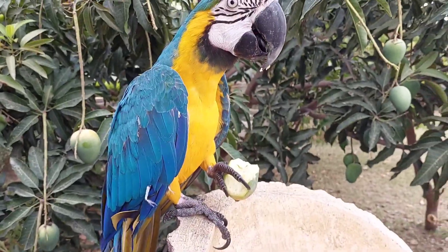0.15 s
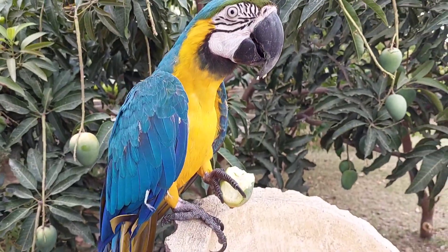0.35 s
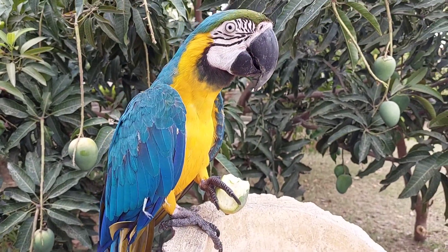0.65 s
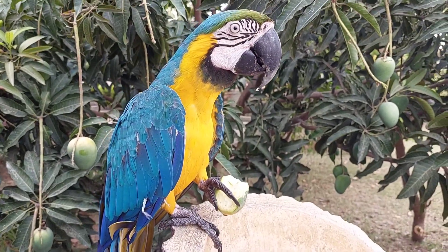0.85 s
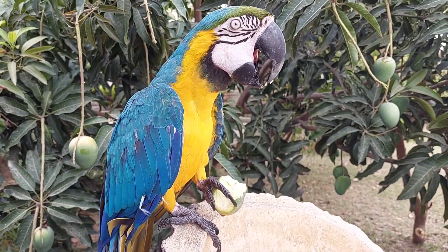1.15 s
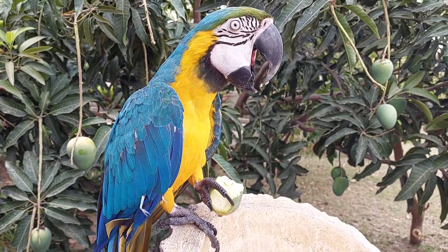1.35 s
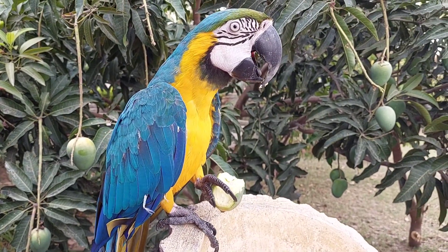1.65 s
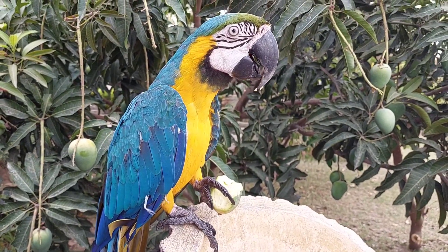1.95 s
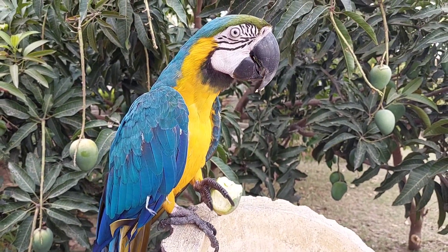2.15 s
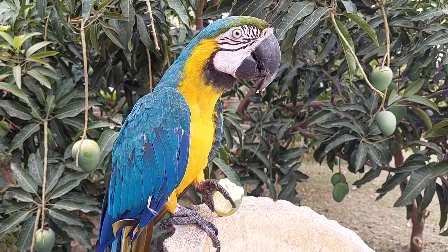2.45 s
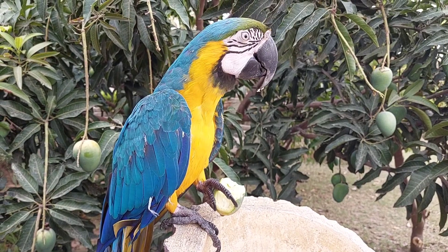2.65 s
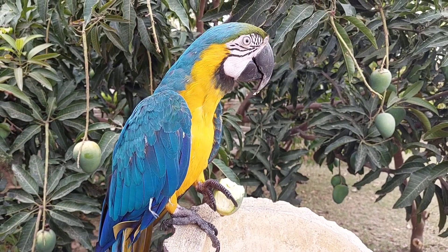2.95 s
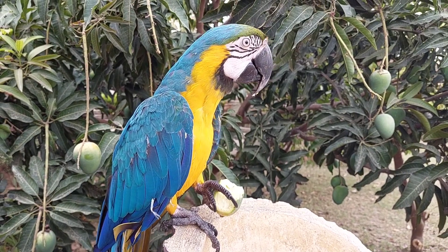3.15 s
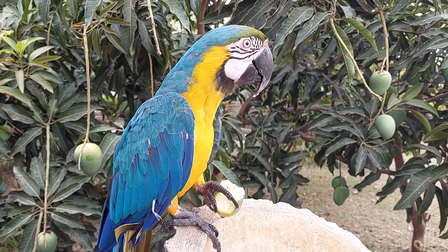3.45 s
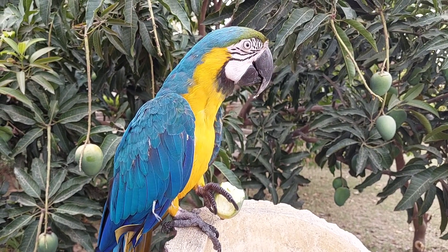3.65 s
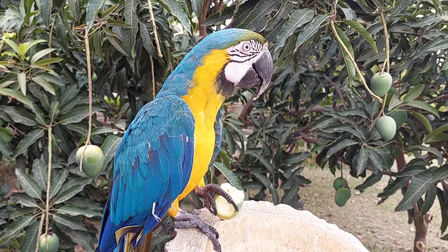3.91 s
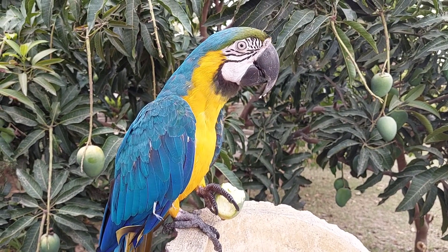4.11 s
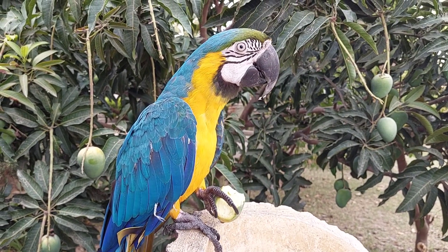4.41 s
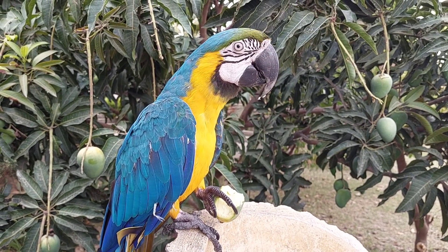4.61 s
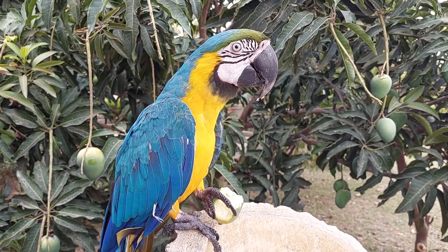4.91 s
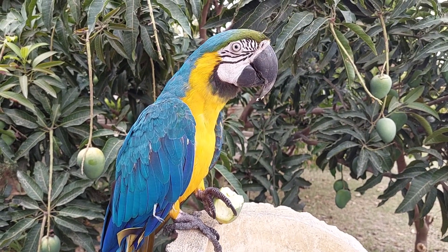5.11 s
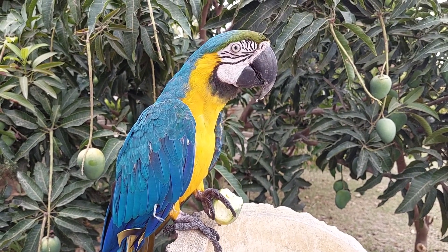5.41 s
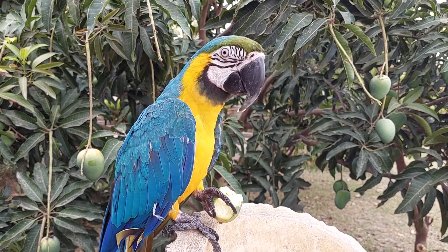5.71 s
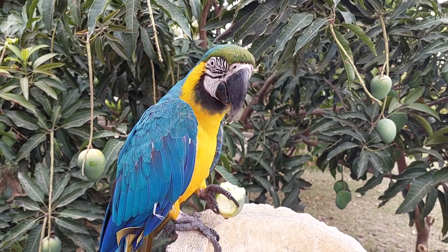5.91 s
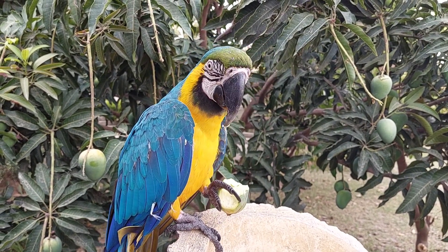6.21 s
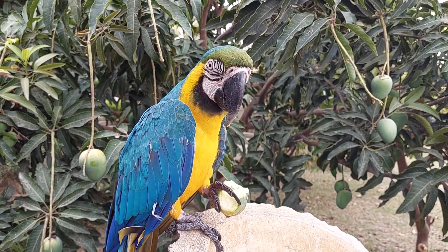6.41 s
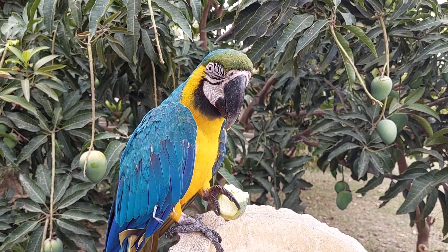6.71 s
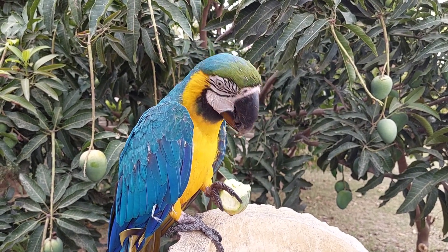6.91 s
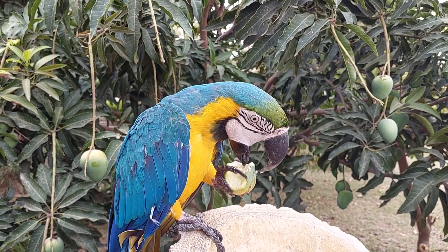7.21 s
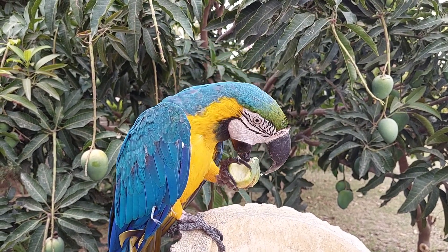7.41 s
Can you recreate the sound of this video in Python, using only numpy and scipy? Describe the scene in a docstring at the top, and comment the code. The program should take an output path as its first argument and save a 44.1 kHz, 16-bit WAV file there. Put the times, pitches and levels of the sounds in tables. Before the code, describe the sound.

A close parrot squawks raucously once, then mutters chirps, clucks and soft whistles in a quiet garden with faint distant birds.

```python
"""A chirp's tail opens the scene; far birds call, a beak clicks, and at 1.1 s a macaw squawks and warbles.
Falling chirps, a rustle and nasal clucks follow, then from 3.4 s a growl, a squeal and soft whistles.
A squall falls at 5.7 s; more clucks and, at the end, two chirps follow. Clicks and far calls are dotted about.
Calls are stacks of overtones plus hoarse noise, coloured by a throat; clicks and rustles are shaped noise.
The garden returns a weak echo over faint rumble and hiss; a mid-range haze is gone by 0.8 s."""
import sys
import numpy as np
from scipy import signal
from scipy.fft import rfft, irfft
from scipy.io import wavfile
from scipy.ndimage import uniform_filter1d

SR = 44100
rng = np.random.default_rng(int(sys.argv[2]) if len(sys.argv) > 2 else 0)


def log_audio(samples):
    """Write samples as a 16-bit WAV file to the path given in sys.argv[1]."""
    # one column per channel
    frames = np.atleast_2d(samples).T
    # limit to full scale, then quantise
    limited = np.clip(frames, -1, 1)
    pcm = np.round(limited * 32767).astype(np.int16)
    wavfile.write(sys.argv[1], SR, pcm)


N = 333396  # length in samples
CUTOFF_HZ = 16000  # top of the sound


# the loud squawk, one row: (start t/s, length/s, held f/Hz, held level/dB)
SQUAWK = (1.103, .389, 795, -10.9)
# throat and beak resonances of the squawk: (f/Hz, level/dB)
SQUAWK_THROAT = [(480, -34), (680, -16), (950, -13.5), (1250, -10.5), (1550, 1), (2050, -5), (2700, -10),
                 (3130, -1), (3500, -1.5), (3750, -10.5), (4350, -14.5), (4620, -25), (5500, -17),
                 (6250, -24), (7050, -17), (10000, -33)]
# between its throbbing entry and its warble the squawk flips up to a clean pitch
FLIP_START_S, FLIP_END_S, FLIP_RATIO, FLIP_DB = 1.189, 1.208, 1.1, 2
ENTRY_THROB_DB = 4.5  # extra throb before the flip, for a voice with no roughness


def squawk(throb_db=1.55, held_rough=0.39, slack_rough=0.8, bend=0.03, third_db=-6,
           top_dull_db=3, entry_dull_db=6, opening_s=.17):
    """It starts low, rough and dull, throbs, flips up once, then saws, loudest and brightest low in each sweep."""
    start, length, held_hz, level_db = SQUAWK
    t, hz = glide(start, length, held_hz, slide=0.033, scoop=.85, scoop_s=.08, droop=0.82, droop_s=0.062)
    # a pitch below the held one means a slack, rougher voice
    rough = held_rough + slack_rough * np.maximum(1 - hz / held_hz, 0)
    # both switches go from 0 to 1 within 5 ms
    flipped = np.clip(np.minimum(t - FLIP_START_S, FLIP_END_S - t) / .005, 0, 1)
    entry = np.clip((FLIP_START_S - t) / .005, 0, 1)
    sweep, swell_db = warble(t)
    shake = (1 - flipped) * flutter(len(t))
    hz = hz * FLIP_RATIO ** flipped * sweep * (1 + bend * (1 + entry) * shake)
    level_db = level_db + effort(t, start, length, attack_s=0.074, release_s=0.031, edge_db=38)
    level_db = level_db + FLIP_DB * flipped + swell_db
    level_db = level_db + (throb_db + ENTRY_THROB_DB * entry * (1 - rough)) * shake
    edges = ramp(t - start, opening_s) + ramp(start + length - t, opening_s / 2)
    dull_db = top_dull_db * (sweep - 1) + entry_dull_db * edges
    rough = rough * (1 + entry / 2 - flipped / 2)
    return voice(t, hz, level_db, rough, SQUAWK_THROAT, jitter=.13, rasp_share=.55,
                 harmonic_db={3: third_db}, dull_db=dull_db)


# one sweep of the warble, up and snapping back: (share of the cycle, pitch ratio, level/dB)
WARBLE = [(0, 1.03, -1), (.2, 1.04, 3), (.42, 1.15, 0), (.65, 1.32, -2), (.87, 1.54, -7), (1, 1.03, -1)]
WARBLE_START_S, WARBLE_END_S = 1.2035, 1.466
WARBLE_HZ, WARBLE_SLOWS_HZ_PER_S = 29.6, 14.5  # sweeps per second at the start, and how fast they slow


def warble(t):
    """Pitch ratio and swell (dB) of the squawk's sweeps, which slow a little as they go."""
    age = t - WARBLE_START_S
    warbling = (t > WARBLE_START_S) & (t < WARBLE_END_S)
    cycle = (WARBLE_HZ - WARBLE_SLOWS_HZ_PER_S * age / 2) * age % 1
    share, ratio, swell_db = np.transpose(WARBLE)
    return np.interp(cycle, share, ratio) ** warbling, warbling * np.interp(cycle, share, swell_db)


def puffs(level_db=-39.5, top_hz=130, right_db=-12):
    """Each sweep of the warble pushes out a low thump of air, made of low-pitched noise."""
    t = np.arange(int(WARBLE_START_S * SR), int(WARBLE_END_S * SR)) / SR
    low_band = signal.butter(2, [50, top_hz], "band", fs=SR, output="sos")
    thump = rms_one(signal.sosfilt(low_band, rng.standard_normal(len(t))))
    level = from_db(level_db + warble(t)[1]) * signal.windows.tukey(len(t), .5)
    return from_db([[0], [right_db]]) * place(t, level * thump)


def flutter(size, flutter_hz=98, unevenness=.03):
    """A slow second vibration of the syrinx (the bird's voice box), in harsh calls."""
    rate_hz = flutter_hz * (1 + unevenness * wander(size, flutter_hz))
    return np.sin(2 * np.pi * np.cumsum(rate_hz) / SR)


# a clean squeal that breaks into a lower register, one list each: (t/s, f/Hz, level/dB)
SQUEAL = [
    [(3.855, 2985, -57), (3.865, 2918, -16.5), (3.892, 2818, -12.5), (3.908, 2700, -25.5),
     (3.922, 2650, -28)],
    [(3.914, 2130, -26.5), (3.928, 2080, -19.5), (3.96, 1720, -17.5), (3.983, 1526, -12),
     (4.005, 1187, -24), (4.02, 960, -48.5)],
]
# throat and beak resonances of the squeal: (f/Hz, level/dB)
SQUEAL_THROAT = [(1000, -31), (2000, -24), (2900, -1.5), (4200, -14.5), (5700, -22), (9500, -50)]


def squeal(rows, slack_rough=0.61, slack_hz=1120, third_db=-5):
    """A taut syrinx sings clean; it roughens as the pitch sags."""
    t, hz, level_db = controls(rows)
    rough = slack_rough * np.minimum(slack_hz / hz, 1) ** 5
    return voice(t, hz, level_db, rough, SQUEAL_THROAT, harmonic_db={3: third_db})


# a squall that starts harsh and clears as it falls: (t/s, f/Hz, level/dB before the throb, roughness 0-1)
SQUALL = [(5.676, 1125, -54, 0.8), (5.683, 1090, -33, 0.47), (5.697, 1025, -26.5, 0.4),
          (5.71, 798.6, -28, 0.8), (5.73, 1256, -23, 0.5), (5.755, 1124, -30.5, 0.4),
          (5.845, 791.6, -33, 0.2), (5.9, 626.7, -36.5, 0.2), (5.955, 481, -65.5, 0.39)]
# throat and beak resonances of the squall: (f/Hz, level/dB)
SQUALL_THROAT = [(380, -8), (650, -7.5), (1500, -7), (2450, 1.5), (3100, -5), (4100, 0.5), (5500, -10),
                 (15000, -34)]


def squall(throb_db=4):
    """A falling cry that throbs where it is harshest."""
    t, hz, level_db, rough = controls(SQUALL)
    throb = throb_db * rough ** 2 * flutter(len(t))
    return voice(t, hz, level_db + throb, rough, SQUALL_THROAT)


# the growl: (t/s, f/Hz before the flutter, level/dB)
GROWL = [(3.423, 705.6, -60.5), (3.435, 685.5, -40.5), (3.452, 664.5, -34), (3.533, 612, -38),
         (3.581, 630.6, -31), (3.657, 641, -32.5), (3.723, 518.5, -42.5), (3.747, 480, -66)]
# throat and beak resonances of the growl: (f/Hz, level/dB)
GROWL_THROAT = [(630, -6), (950, -16), (1200, -6), (1600, -11.5), (2200, -3.5), (2500, 6.5), (2750, -9),
                (3400, 0), (4050, -10.5), (4750, -11.5), (8000, -51)]


def growl(bend=0.075, rough=.24):
    """The flutter bends a low tone so far that its overtones split into a dense, even buzz."""
    t, hz, level_db = controls(GROWL)
    shake = flutter(len(t), flutter_hz=94, unevenness=.03)
    return voice(t, hz * (1 + bend * shake), level_db, rough, GROWL_THROAT, jitter=.05, drift_db=1,
                 steady_s=.003)


# falling chirps: (start t/s, length/s, middle f/Hz, slide octaves/s, level/dB before shaping,
# opening roughness 0-1, fundamental level/dB, swell dB/s)
CHIRPS = [(-.02, .1, 947, -2, -35, 0, -4.5, -120), (1.698, .083, 1520, -3.5, -37, 0, -4.5, -16),
          (1.89, 0.098, 1302, -3.5, -47, 0.9, 1, 56), (2.119, .098, 1094, -4.5, -52.5, .3, 3, -50),
          (7.233, .08, 1393, -5, -27.5, 0, 0.5, -63), (7.439, 0.093, 1334, -1.5, -27, .55, 3, 48.5)]
# throat and beak resonances of the chirps: (f/Hz, level/dB)
CHIRP_THROAT = [(500, -38), (1300, -13), (1900, -10), (2400, -7.5), (3000, 0.5), (4100, -8.5),
                (5600, -17.5), (7000, -28.5), (9000, -43.5)]


def chirp(start, length, pitch_hz, slide, level_db, opening_rough, fundamental_db, swell,
          end_rough=0.62, throb_db=3, opening_dull_db=4):
    """A note that starts sharp and covered, clears as it slides down and breaks up as it drops away."""
    # the negative scoop starts the note above its pitch
    t, hz = glide(start, length, pitch_hz, slide, scoop=-.08 - .3 * opening_rough, scoop_s=.03,
                  droop=0.58, droop_s=0.023)
    opening = ramp(t - start, .07)
    rough = .25 + opening_rough * opening + end_rough * ramp(start + length - t, .045)
    level_db = level_db + effort(t, start, length, attack_s=.006, release_s=0.024, swell_db_per_s=swell)
    level_db = level_db + throb_db * rough * wander(len(t), 300)
    return voice(t, hz, level_db, rough, CHIRP_THROAT, jitter=.1, rasp_share=.35,
                 harmonic_db={1: fundamental_db - opening_dull_db * opening},
                 dull_db=softness(level_db.max()) + opening_dull_db * opening)


# nasal clucks, in two runs: (start t/s, length/s, middle f/Hz, slide octaves/s, level/dB before shaping,
# opening scoop octaves, closing flick octaves)
CLUCKS = [(2.658, .115, 985, -1, -55.5, 0.8, 0.058), (2.867, .1, 715, 2.5, -48.5, -.15, 0.22),
          (3.112, .088, 925, -0.2, -49, -0.12, .22), (6.311, .108, 985, -1.43, -41.5, 0.55, 0.15),
          (6.501, 0.11, 690, 1.96, -37.5, -.1, 0.19), (6.714, .105, 940, -3, -44.5, -0.07, 0.214)]
# throat and beak resonances of the clucks: (f/Hz, level/dB)
CLUCK_THROAT = [(450, -1), (700, -6.5), (2200, -2.5), (2800, -8), (3550, 0), (4500, -13), (6800, -19.5),
                (9000, -36)]


def cluck(start, length, pitch_hz, slide, level_db, scoop, flick, held_rough=0.11, end_rough=0.85):
    """A nasal note with uneven harmonics scoops in from below or above, then flicks up and frays."""
    t, hz = glide(start, length, pitch_hz, slide, scoop, scoop_s=0.029, droop=-flick, droop_s=0.049)
    rough = held_rough + end_rough * ramp(start + length - t, .045)
    shape_db = effort(t, start, length, attack_s=.024 + 0.024 * scoop, release_s=0.0316,
                      swell_db_per_s=-14, edge_db=23.5)
    return voice(t, hz, level_db + shape_db, rough, CLUCK_THROAT, drift_db=4, drift_hz=26.2,
                 dull_db=softness(level_db) / 2)


# hoarse run-ups to chirps and clucks: (start t/s, length/s, level/dB before shaping, middle f/Hz)
RUN_UPS = [(1.638, .038, -41.5, 912), (1.855, 0.042, -52, 897), (2.085, 0.039, -51, 1050),
           (2.621, 0.053, -69, 484), (6.274, 0.071, -55, 471), (7.171, 0.044, -32.5, 905),
           (7.394, 0.051, -33, 1013)]


def run_up(start, length, level_db, middle_hz, rise_octaves=2.1):
    """The run-up to a note: a hoarse, swelling upward sweep, duller when soft."""
    t, hz = glide(start, length, middle_hz, slide=rise_octaves / length)
    shape_db = effort(t, start, length, attack_s=.042, release_s=.014)
    throat = CLUCK_THROAT if middle_hz < 600 else CHIRP_THROAT
    return voice(t, hz, level_db + shape_db, .65, throat, jitter=.1, harmonic_db={1: 8},
                 dull_db=softness(level_db))


# soft arched whistles: (start t/s, top f/Hz, slide octaves/s, level/dB before shaping, closing droop octaves)
WHISTLES = [(4.087, 1585, -1.5, -43.5, .6), (4.314, 1505, -0.47, -42, 0.62),
            (4.545, 1440, -0.19, -40.5, .45), (4.777, 1435, -0.056, -40, .22), (5.019, 1405, 1.1, -39.3, 0)]
# throat and beak resonances of the whistles: (f/Hz, level/dB)
WHISTLE_THROAT = [(700, -11), (1400, -8), (3000, -26), (4400, -32), (8200, -48), (10300, -29.5),
                  (15000, -47)]


def whistle(start, pitch_hz, slide, level_db, droop, length=.145, edge_rough=0.36, edge_dull_db=12):
    """A soft arch that swells towards its end, clean and bright on top, husky and dull on its flanks."""
    t, hz = glide(start, length, pitch_hz, slide, scoop=1.0, scoop_s=0.081, droop=droop, droop_s=0.038)
    slack = np.abs(np.log2(hz / pitch_hz))  # octaves away from the top
    shape_db = effort(t, start, length, attack_s=0.0585, release_s=0.02, swell_db_per_s=59)
    return voice(t, hz, level_db + shape_db, 0.047 + edge_rough * slack, WHISTLE_THROAT, jitter=0.26,
                 dull_db=edge_dull_db * slack)


# beak clicks: (t/s, peak level/dB)
CLICKS = [(0.3885, -41.5), (.85, -36.5), (4.1353, -21), (4.6835, -24), (5.608, -43.5), (6.655, -45.5),
          (7.322, -36.5)]
# colour of the beak's crack: (f/Hz, level/dB)
BEAK = [(1000, -12.5), (2000, 8), (4500, -17.5), (7000, -7), (15000, -14)]


def beak(t60=0.05, firm_db=-21, db_per_octave=16):
    """The horn of the beak snaps: a short, dry crack, thinner and shorter the lighter the touch."""
    age = np.arange(SR // 10) / SR
    out = np.zeros(N)
    for s, peak_db in CLICKS:
        light = 2 ** ((firm_db - peak_db) / db_per_octave)  # 1 for a firm click, whose 60 dB fade takes t60
        fade = from_db(-60 * age * np.sqrt(light) / t60)
        crack = noise(len(age), BEAK, 1600 * light) * fade
        out += place(s + age, from_db(peak_db) * crack / np.abs(crack).max())
    return out


# soft rustles: (start t/s, length/s, level/dB before the grain)
RUSTLES = [(2.412, 0.21, -64.5), (5.377, 0.29, -62.5)]


def rustle(start, length, level_db, grain_db=3.0):
    """A soft, airy rustle: grainy noise that swells and fades."""
    t = start + np.arange(int(length * SR)) / SR
    level = from_db(level_db + grain_db * wander(len(t), 121)) * signal.windows.tukey(len(t), .6)
    return place(t, level * noise(len(t), HISS, 760))


# how the right microphone port differs from the left: (f/Hz, weaker by level/dB, phase lag radians)
PORTS = [(598.6, 2.5, -0.35), (940, -1, 0.39), (1350, 5, .8), (1640, 5, 1.2), (1845, 7.5, 2.2),
         (2330, 1.5, -2.2), (2950, 7, -.9), (3666, 7, -0.77), (4320, 14, 1.1), (7000, 13, 1.5)]
# the same for the squawk: (f/Hz, weaker by level/dB, phase lag radians)
SQUAWK_PORTS = [(900, 5.5, 0.73), (2396, -1, 1.6), (3270, 7.5, 2.4), (7000, 8, 0.89)]
RIGHT_LEAD_S = 0.00033  # time lead of the right side, on top of the phase lags


def ports(x, table, lead_s=0):
    """The two microphone ports hear a near sound with different level and phase."""
    hz = np.fft.rfftfreq(N, 1 / SR)
    phase = 2 * np.pi * hz * lead_s - at_hz(table, hz, axis=2)
    right = from_db(-at_hz(table, hz)) * np.exp(1j * phase)
    return np.array([x, irfft(rfft(x) * right, N)])


def voice(t, hz, level_db, rough, throat, jitter=0.086, jitter_hz=900, shimmer=0.94, shimmer_hz=400,
          drift_db=3.0, drift_hz=45, rasp_share=0.71, harmonic_db={}, dull_db=0, steady_s=.01):
    """The syrinx sends harmonics through the throat; roughness shakes them and adds a puff of rasp per cycle."""
    # harmonic_db sets single harmonics, dull_db is an overtone loss per octave, steady_s evens the loudness
    size, rough = len(t), np.clip(rough, 0, .95)
    phase = 2 * np.pi * np.cumsum(hz * (1 + jitter * rough * wander(size, jitter_hz))) / SR
    source = 0
    for k in range(1, int(CUTOFF_HZ / hz.min()) + 1):
        # each harmonic drifts a little in strength at random
        gain_db = harmonic_db.get(k, 0) - dull_db * np.log2(k) + drift_db * wander(size, drift_hz)
        below_top = np.clip(8 * (1 - k * hz / CUTOFF_HZ), 0, 1)
        flicker = 1 + shimmer * rough * wander(size, shimmer_hz)
        wave = np.cos(k * phase + rng.uniform(0, 2 * np.pi))
        source = source + from_db(gain_db) * below_top * flicker * wave
    tone = coloured(source, throat, 300)
    tone = tone / np.sqrt(uniform_filter1d(tone ** 2, size=int(steady_s * SR) + 1) + 1e-6)
    rasp = rms_one(noise(size, throat, 500) * (2 + np.cos(phase)))
    # a dull voice also loses the treble of its rasp
    body = signal.sosfiltfilt(signal.butter(2, 3000, fs=SR, output="sos"), rasp)
    rasp = body + from_db(-2 * dull_db) * (rasp - body)
    share = np.clip(rasp_share * rough, 0, 1)
    mixed = np.sqrt(1 - share ** 2) * tone + share * rasp
    ends = signal.windows.tukey(size, .06)
    return place(t, ends * from_db(level_db) * mixed)


def glide(start, length, hz, slide=0, scoop=0, scoop_s=1, droop=0, droop_s=1):
    """Times and pitch of a note: scoop up from below (octaves), slide through hz (octaves/s), droop (octaves)."""
    t = np.arange(max(int(start * SR), 0), min(int((start + length) * SR), N)) / SR
    age = t - start
    octaves = slide * (age - length / 2) - scoop * ramp(age, scoop_s) - droop * ramp(length - age, droop_s)
    return t, hz * 2 ** octaves


def effort(t, start, length, attack_s, release_s, swell_db_per_s=0, edge_db=28):
    """Attack, a slowly changing hold and release of a note, in dB."""
    age = t - start
    edges = ramp(age, attack_s) + ramp(length - age, release_s)
    return swell_db_per_s * (age - length / 2) - edge_db * edges


def ramp(s, width_s):
    """1 at the edge of a note, easing to 0 width_s inside it."""
    return np.clip(1 - s / width_s, 0, 1) ** 2


# notes below full voice lose overtones: dB per octave for each dB of level
FULL_VOICE_DB, DULL_PER_DB = -37.5, 0.2


def softness(level_db):
    """The softer a note, the weaker its overtones (dB per octave)."""
    return DULL_PER_DB * max(FULL_VOICE_DB - level_db, 0)


def from_db(db):
    """Decibels to a plain multiplier."""
    return 10 ** (np.asarray(db) / 20)


def rms_one(x):
    """A sound scaled to an average (rms) strength of 1."""
    return x / np.sqrt(np.mean(x ** 2) + 1e-20)


def at_hz(points, hz, axis=1):
    """One column of a spectrum table, read on a log-frequency axis."""
    points = np.array(points)
    return np.interp(np.log(hz + 1), np.log(points[:, 0]), points[:, axis])


def controls(rows):
    """The sample times that a table spans, then each of its columns at those times."""
    s, *columns = np.transpose(rows)
    t = np.arange(max(int(s[0] * SR), 0), min(int(s[-1] * SR), N)) / SR
    return [t] + [np.interp(t, s, c) for c in columns]


def place(t, x):
    """A short sound set into silence at its time."""
    start = round(t[0] * SR)
    return np.pad(x, (start, N))[:N]


def play(source, rows):
    """All the events of one table."""
    return sum(source(*row) for row in rows)


def wander(size, rate_hz):
    """Random drift joined by straight lines; rms 1."""
    at = np.arange(size) * rate_hz / SR
    return rms_one(np.interp(at, np.arange(size), rng.standard_normal(size)))


def coloured(x, spectrum, low_hz):
    """A sound given the colour of a spectrum table, dying away below low_hz; rms 1."""
    hz = np.fft.rfftfreq(len(x), 1 / SR)
    gain = from_db(at_hz(spectrum, hz)) * hz ** 4 / (hz ** 4 + low_hz ** 4)
    return rms_one(irfft(rfft(x) * gain, len(x)))


def noise(size, spectrum, low_hz):
    """Noise of a given colour; rms 1."""
    return coloured(rng.standard_normal(size), spectrum, low_hz)


# far birds whistle, coo, tweet and moan: (start t/s, length/s, middle f/Hz, slide octaves/s,
# peak level/dB before the far mix, loudest at share of the length)
FAR_CALLS = [(0.377, 0.19, 1680, 1.7, -73, 0.67), (0.966, 0.14, 1570, 2, -64.5, 0.94),
             (4.622, 0.38, 634, -0.5, -59, 0.051), (5.448, .15, 642, -0.95, -59.5, 0.34),
             (6.288, 0.11, 5080, 6, -47, 1), (6.924, 0.093, 1211, -3, -50, 0.28),
             (7.003, 0.097, 1218, 2.4, -55.5, 0.53)]
# colour of the far calls: (f/Hz, level/dB)
FAR_THROAT = [(650, 2.5), (1200, -20.5), (2450, -20.5), (3300, -39), (12000, -75.5)]


def far_call(start, length, pitch_hz, slide, level_db, peak_share, fade_db=14, waver=.028):
    """A distant bird: one wavering slide that swells to a peak and fades."""
    t, hz = glide(start, length, pitch_hz, slide)
    peak = start + length * np.clip(peak_share, .05, .95)
    level_db = level_db - fade_db * np.interp(t, [start, peak, start + length], [1, 0, 1])
    return voice(t, hz * (1 + waver * wander(len(t), 30)), level_db, .18, FAR_THROAT, jitter=0.2)


def perch(x, scatter_db=-19, scatter_t60=0.15):
    """The perch and the nearest leaves scatter the treble back at once, differently to each side."""
    age = np.arange(SR // 20) / SR
    echoes = rng.standard_normal((2, len(age))) * from_db(-60 * age / scatter_t60)
    echoes = signal.sosfilt(signal.butter(1, 4000, "high", fs=SR, output="sos"), echoes)
    echoes = rms_one(echoes) / np.sqrt(len(age))
    return from_db(scatter_db) * signal.fftconvolve(x[None], echoes, axes=1)[:, :N]


GARDEN_T60_S = 0.33  # time for the echo to fade by 60 dB


def garden(x, leaves_hz=3500):
    """Trunks and leaves scatter a dull, diffuse tail, different on each side."""
    age = np.arange(SR) / SR
    tail = rng.standard_normal((2, SR)) * from_db(-60 * age / GARDEN_T60_S)
    tail = signal.sosfilt(signal.butter(2, leaves_hz, fs=SR, output="sos"), tail)
    return signal.fftconvolve(x[None], rms_one(tail) / np.sqrt(SR), axes=1)[:, :N]


# colours of the rumble, the hiss (also of the rustles) and the haze: (f/Hz, level/dB)
RUMBLE = [(70, 2), (140, -12), (400, -24), (13000, -55.5)]
HISS = [(1500, -2.5), (8000, -2), (13000, 2.5)]
HAZE = [(2400, -0.5), (3200, -18)]
# their levels over time, on the left for rumble and hiss: (t/s, level/dB)
RUMBLE_LEVEL = [(0, -66), (1.1, -71), (1.6, -82.5), (2.35, -82.5), (3.05, -67.5), (7.5, -64.5)]
HISS_LEVEL = [(0, -70.5), (1.1, -80), (2.35, -93), (3, -75.5), (7.5, -64)]
HAZE_LEVEL = [(0, -74), (.62, -74), (.78, -99)]


def air():
    """Faint outdoor rumble and hiss, which dip around and after the squawk, and a haze that dies away."""
    t, haze_db = controls(HAZE_LEVEL)
    haze = place(t, from_db(haze_db) * noise(len(t), HAZE, 580))
    rumble = bed(RUMBLE, RUMBLE_LEVEL, low_hz=58, right_db=2, alike=0.53)
    hiss = bed(HISS, HISS_LEVEL, low_hz=900, right_db=-2.5, alike=0.28)
    return haze + rumble + hiss


def bed(spectrum, levels, low_hz, right_db, alike):
    """Background noise on a level curve, partly shared by the two sides."""
    level = from_db(np.interp(np.arange(N) / SR, *np.transpose(levels)))
    left, other = noise(N, spectrum, low_hz), noise(N, spectrum, low_hz)
    alike = np.clip(alike, 0, 1)
    right = alike * left + np.sqrt(1 - alike ** 2) * other
    return level * np.array([left, from_db(right_db) * right])


SETTLE_S, SETTLE_PAN_DB = 0.49, 9.5  # at first right is raised and left lowered by this much


def scene():
    """The macaw, far birds, echo and air; near sounds other than the squawk lean right until the pan settles."""
    loud, clucks = squawk(), play(cluck, CLUCKS)
    chatter = growl() + beak() + squall() + sum(squeal(register) for register in SQUEAL)
    chatter += clucks + play(run_up, RUN_UPS) + play(chirp, CHIRPS) + play(whistle, WHISTLES)
    far = play(far_call, FAR_CALLS)
    # the clucks ring more and the far calls ring most
    sent = from_db(-32) * loud + from_db(-32.5) * chatter + from_db(-29) * clucks + from_db(-8.5) * far
    echo = garden(sent) + perch(loud + chatter)
    pan = from_db(SETTLE_PAN_DB * ramp(np.arange(N) / SR, SETTLE_S) * [[-1], [1]])
    near = pan * ports(chatter + play(rustle, RUSTLES), PORTS, RIGHT_LEAD_S)
    return ports(loud, SQUAWK_PORTS) + puffs() + near + from_db(-1.5) * far + echo + air()


def record(dry):
    """The highest peaks are rounded, the top is cut."""
    rounded = dry / (1 + (dry / .95) ** 8) ** (1 / 8)
    return signal.sosfilt(signal.ellip(10, .1, 80, CUTOFF_HZ, fs=SR, output="sos"), rounded)


dry = scene()
out = record(dry)
log_audio(out)
```